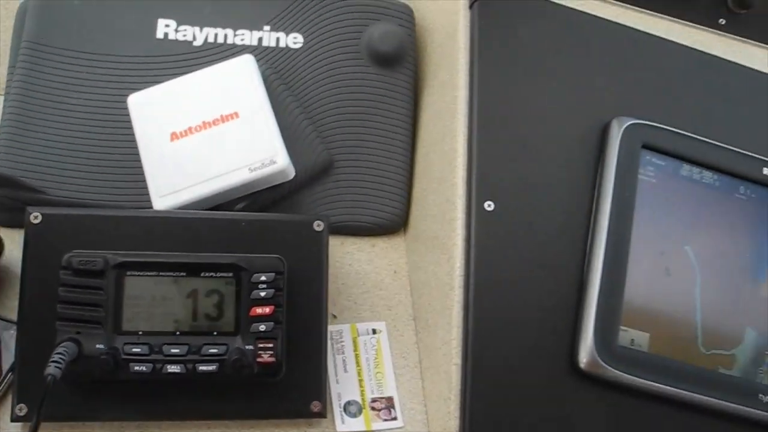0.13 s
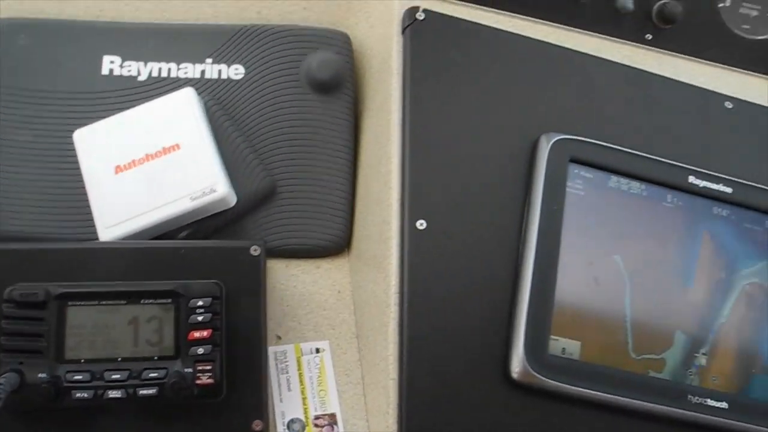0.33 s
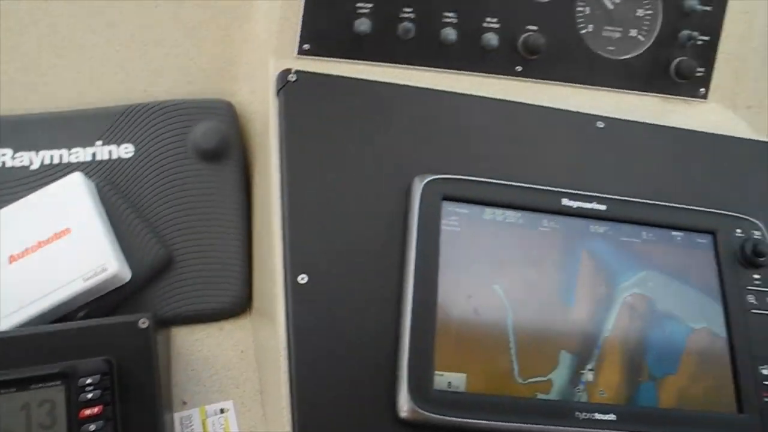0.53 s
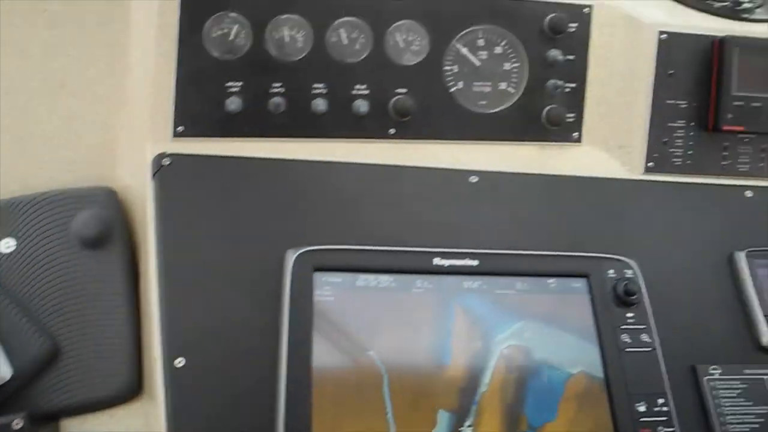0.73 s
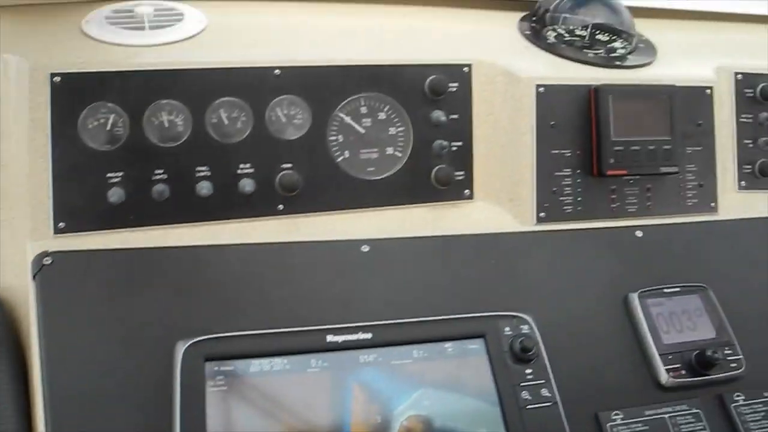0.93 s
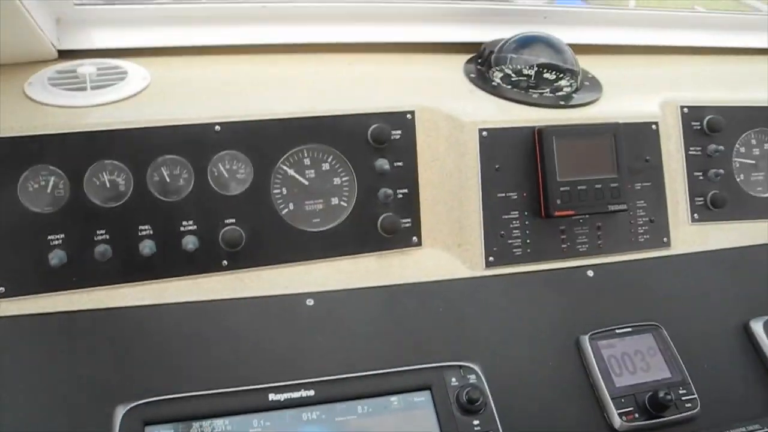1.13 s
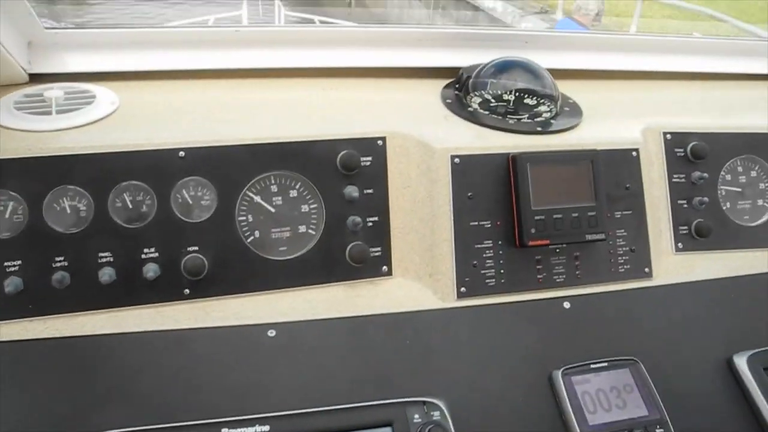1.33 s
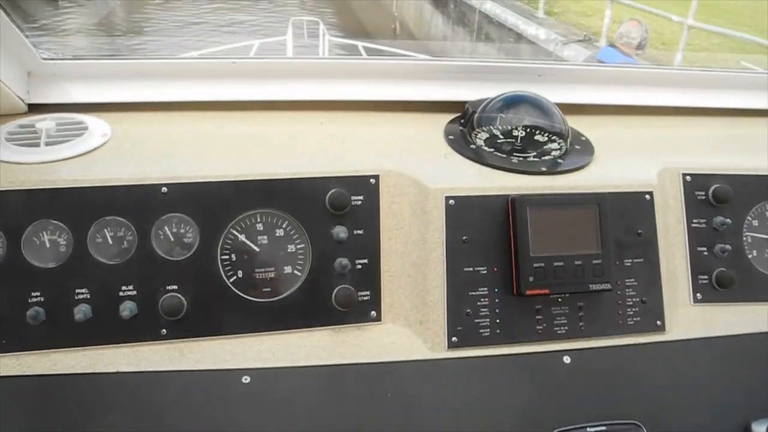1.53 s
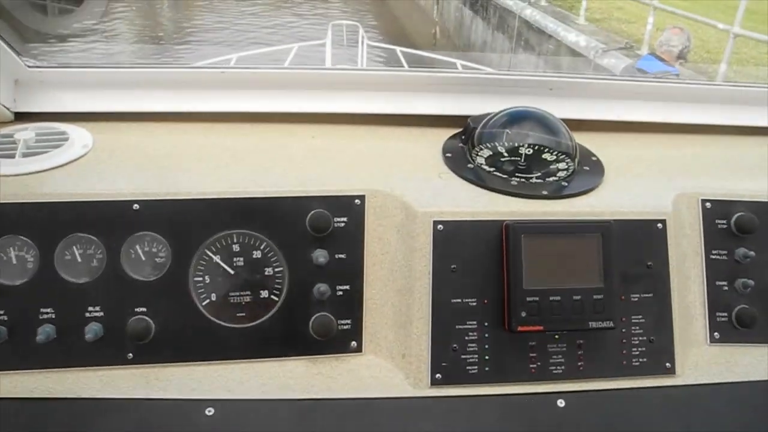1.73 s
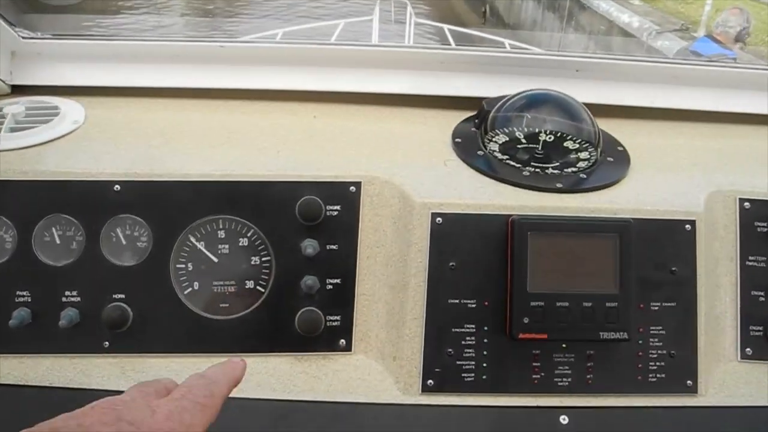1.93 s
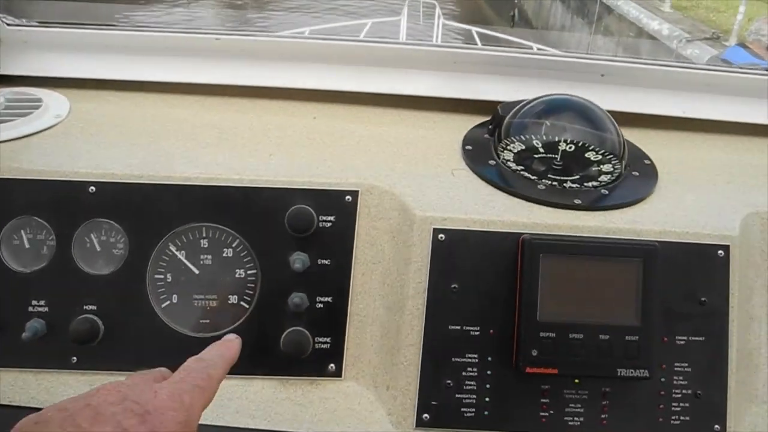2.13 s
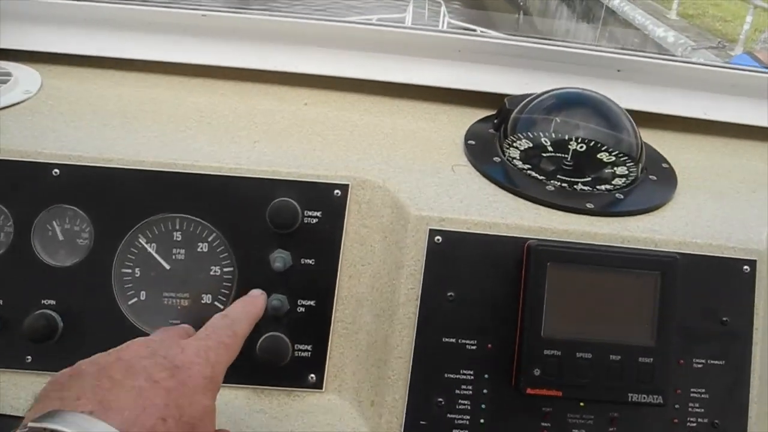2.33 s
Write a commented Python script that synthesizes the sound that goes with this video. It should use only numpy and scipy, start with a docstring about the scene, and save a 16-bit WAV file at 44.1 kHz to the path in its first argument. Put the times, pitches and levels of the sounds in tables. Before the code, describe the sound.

Low, throbbing diesel idle heard inside a small boat cabin. A loud, close knock comes almost at once, bounces quickly and briefly ducks the engines, which swell back and run steadily with a soft whine.

```python
"""Moored boat with idling diesels

Two diesel engines idle below the helm: firing tones, valve ticks, buzzing panels, pulsed hull noise and a whine.
A hard knock close by sets modes ringing; it bounces, and a loose part rattles to rest in a small cabin.
A limiter ducks everything at the loud blows and slowly lets the engines back.
A hand or sleeve brushes softly now and then, as short swells of grainy noise."""
import sys
import numpy as np
from scipy import signal
from scipy.io import wavfile
from scipy.ndimage import uniform_filter1d, minimum_filter1d

SR = 44100
rng = np.random.default_rng(int(sys.argv[2]) if len(sys.argv) > 2 else 0)


def log_audio(samples):
    """Write samples as a 16-bit WAV file to the path given in sys.argv[1]."""
    # one column per channel
    frames = np.atleast_2d(samples).T
    # limit to full scale, then quantise
    limited = np.clip(frames, -1, 1)
    pcm = np.round(limited * 32767).astype(np.int16)
    wavfile.write(sys.argv[1], SR, pcm)


N = 104605
T = np.arange(N) / SR  # time in s

FIRING_HZ, SECOND_FIRING_HZ, FIRST_FIRING_S = 25.05, 29.05, 0.0168
CYLINDERS = 4  # firings in one engine cycle
PULSE_DEPTH = 0.11  # modulation of noise by the firings, in log amplitude


def from_db(db):
    """Level to amplitude: 20 dB is a factor of ten."""
    return 10 ** (np.asarray(db) / 20)


def rms_one(x):
    """Normalization to unit mean power."""
    return x / np.sqrt(np.mean(x ** 2) + 1e-20)


def at_hz(points, hz):
    """Linear interpolation of a table on a logarithmic frequency axis."""
    table = np.array(points)
    return np.interp(np.log(hz), np.log(table[:, 0]), table[:, 1])


def pan(db):
    """Interchannel level difference, positive to the left: two gains with a mean of one."""
    gains = from_db([[db / 2], [-db / 2]])
    return gains / gains.mean()


def filtered(x, hz, kind, order=2):
    """Butterworth filtering: a maximally flat passband."""
    sections = signal.butter(order, np.clip(hz, 10, 0.47 * SR), kind, fs=SR, output="sos")
    return signal.sosfilt(sections, x + 1e-18)


def drift(rate):
    """Random fluctuation of unit spread: noise smoothed by a double pole at the given rate in Hz."""
    step = 40  # samples between computed points
    r = np.exp(-2 * step * np.pi * rate / SR)
    noise = rng.standard_normal(N // step + 2002)
    slow = signal.lfilter([1], [1, -2 * r, r * r], noise)[2000:]  # the start-up is dropped
    return np.interp(np.arange(N) / step, np.arange(len(slow)), rms_one(slow))


def ring(clicks, modes):
    """Modal synthesis: each impulse excites exponentially decaying cosines."""
    out = 0
    for hz, db, t60 in modes:
        r = np.exp(-np.log(1000) / (t60 * SR))
        w = 2 * np.pi * hz / SR
        resonator = [1, -r * np.cos(w)], [1, -2 * r * np.cos(w), r * r]
        out = out + from_db(db) * signal.lfilter(*resonator, clicks + 1e-18)
    return out


def burst(s, decay_s):
    """Impulsive noise: a sudden stereo onset with exponential decay."""
    envelope = (T >= s) * np.exp(-np.minimum(np.abs(T - s) / decay_s, 50))
    return envelope * rng.standard_normal((2, N))


def tone(hz, db):
    """Quasi-periodic tone: a sinusoid with slow random level and phase modulation."""
    turn = 2 * np.pi * (hz * T + rng.random()) + 0.18 * drift(1.0)  # phase waver in rad
    level_db = db + 1.2 * drift(1.6)
    return np.sqrt(2) * from_db(level_db) * np.cos(turn)


# Tones of the nearer engine: firing_multiple, level_db, left_right_db
NEAR_ORDERS = [(2, -31, -38), (4.18, -39, -15), (4.745, -28.5, -3), (5, -35, -2), (7, -48, 6),
               (8.05, -41, -15), (9, -40.5, -7.5), (9.5, -38, -1), (11.8, -44, -11), (15, -42, -14),
               (16.6, -44.5, -10)]
# Tones of the second engine: firing_multiple, level_db, left_right_db
SECOND_ORDERS = [(2, -37.5, -14), (3, -38, 2), (3.75, -48, -3)]
THROB_DB, THROB_PAN_DB, THROB_LEAD_S = -19.5, -9, 0.0074  # the throb reaches the left side first


def engine_tones():
    """Engine orders: tones at multiples of the firing rate, above a throb at the nearer engine's rate."""
    lead_s = np.array([[THROB_LEAD_S], [0]])
    turn = 2 * np.pi * FIRING_HZ * (T - FIRST_FIRING_S + lead_s)
    out = np.sqrt(2) * from_db(THROB_DB) * pan(THROB_PAN_DB) * np.cos(turn)
    for firing_hz, orders in ((FIRING_HZ, NEAR_ORDERS), (SECOND_FIRING_HZ, SECOND_ORDERS)):
        for multiple, db, pan_db in orders:
            out = out + pan(pan_db) * tone(multiple * firing_hz, db)
    return out


REPEAT_SHARE = 0.18  # share of the noise power that repeats with every engine cycle


def engine_noise():
    """Cyclostationary noise: part of it recurs with each cycle of the nearer engine."""
    cycle = rng.standard_normal((2, 2, int(SR * CYLINDERS / FIRING_HZ)))
    repeating = cycle[..., np.arange(N) % cycle.shape[-1]]
    fresh = rng.standard_normal((2, 2, N))
    share = np.clip(REPEAT_SHARE, 0, 1)
    return np.sqrt(share) * repeating + np.sqrt(1 - share) * fresh


# Spectrum of hull and engine-room noise, before normalization: frequency_hz, density_db (dB per Hz)
DRONE = [(35, -9.5), (55, -3.5), (85, 0.5), (120, -4.5), (170, -2), (240, -6), (310, -8), (400, -10),
         (500, -16.5), (660, -16), (800, -21.5), (1000, -21.5), (1400, -27), (1800, -29.5), (2700, -32.5),
         (4000, -42), (6000, -48), (9000, -50), (15500, -50)]
# Correlation of the two channels: frequency_hz, likeness (-1 to 1)
LIKENESS = [(50, 0.98), (200, 0.85), (400, 0.97), (750, 0.49), (1400, 0.15), (2800, -0.3), (5500, 0.063),
            (12000, -0.01)]
# Stereo balance, shared with the panels and the whine: frequency_hz, left_right_db
BALANCE_DB = [(60, -13.5), (150, -4), (380, -2.5), (950, -4.5), (2380, -2.1), (5980, -1), (15000, -3.5)]
DRONE_DB, PATCHY_DB, CLATTER_DEPTH = -24, 1.51, 0.026


def drone():
    """Amplitude-modulated band noise: third-octave bands of hull noise swell with both engines' firings."""
    edges = 32 * 2 ** (np.arange(28) / 3)
    firings = 0
    for firing_hz in (FIRING_HZ, SECOND_FIRING_HZ):
        for k in range(1, 4):
            firings = firings + np.cos(2 * np.pi * k * firing_hz * (T - FIRST_FIRING_S)) / k
    white, out = engine_noise(), 0
    for k, (low, high) in enumerate(zip(edges, edges[1:])):
        hz = np.sqrt(low * high)
        depth = at_hz([(400, PULSE_DEPTH), (1500, CLATTER_DEPTH)], hz)
        pulsed = white[k % 2] * np.exp(0.5 * depth * firings)  # neighbouring bands use separate noise
        mid, side = filtered(pulsed, [low, high], "band")
        alike = np.clip(at_hz(LIKENESS, hz), -1, 1)
        stereo = np.sqrt(1 + alike) * mid + np.sqrt(1 - alike) * side * [[1], [-1]]
        gain = from_db(at_hz(DRONE, hz) + PATCHY_DB * drift(12)) * pan(at_hz(BALANCE_DB, hz))
        out = out + gain * stereo
    return from_db(DRONE_DB) * rms_one(out)


CLATTER_DB, CLATTER_HZ, CLATTER_S, CLATTER_SPREAD_DB = -56.5, (1870, 3600), 0.0024, 8.5


def clatter():
    """Repeated impact noise: the valve gear of both engines ticks at each firing, with random strength."""
    clicks = np.zeros(N)
    for firing_hz in (FIRING_HZ, SECOND_FIRING_HZ):
        at = (np.arange(FIRST_FIRING_S, T[-1], 1 / firing_hz) * SR).astype(int)
        clicks[at] += from_db(CLATTER_SPREAD_DB * np.clip(rng.standard_normal(len(at)), -2, 2))
    envelope = signal.lfilter([1], [1, -np.exp(-1 / (CLATTER_S * SR))], clicks + 1e-18)
    ticks = filtered(envelope * rng.standard_normal((2, N)), CLATTER_HZ, "band")
    return from_db(CLATTER_DB) * rms_one(ticks)


# Panels that buzz with the engines: center_hz, width_hz, level_db
PANELS = [(402.4, 74, -41.5), (841, 56, -48.5), (1711, 35, -59.5), (2550, 420, -57)]


def panels():
    """Forced resonance: narrow bands of noise, driven a little harder at each firing of the nearer engine."""
    out = 0
    shake = np.exp(PULSE_DEPTH * np.cos(2 * np.pi * FIRING_HZ * (T - FIRST_FIRING_S)))
    for hz, width_hz, db in PANELS:
        drive = shake * (rng.standard_normal(N) + 0.19 * rng.standard_normal((2, N)))
        buzz = rms_one(filtered(drive, [hz - width_hz / 2, hz + width_hz / 2], "band"))
        out = out + from_db(db) * pan(at_hz(BALANCE_DB, hz)) * buzz
    return out


# Tones of a gear or pump at their loudest: pitch_multiple, level_db
WHINE = [(1, -43.5), (2.155, -57.5)]
WHINE_HZ, WHINE_SWELL_S, WHINE_SWELL_WIDTH_S, WHINE_SWELL_DB = 794.5, 1.45, 0.63, 19.5


def whine():
    """Tonal machine noise: a fundamental and an overtone under a bell-shaped swell in decibels."""
    swell = np.exp(-0.5 * ((T - WHINE_SWELL_S) / WHINE_SWELL_WIDTH_S) ** 2)
    swell_db = WHINE_SWELL_DB * (swell - 1)
    tones = sum(tone(multiple * WHINE_HZ, db + swell_db) for multiple, db in WHINE)
    return pan(at_hz(BALANCE_DB, WHINE_HZ)) * tones


# Nominal modes of the struck thing: pitch_hz, level_db, t60_s
BODY = [(165, -22, 0.091), (236, -23, 0.045), (312.4, -15, 0.11), (379, -18, 0.1), (545, -13, 0.045),
        (704, -12, 0.057), (760, -21, 0.022), (953, -26, 0.037), (988, -26, 0.071), (1230, -17, 0.039),
        (1315, -16, 0.057), (1584, -16, 0.03), (2000, -27, 0.049), (2380, -37.5, 0.036), (2724, -21, 0.024),
        (3194, -18, 0.016)]
CONTACT_S = 0.00073


def strike(clicks, bright_hz):
    """Impact excitation: a half-sine push plus modal ringing, low-passed as by a soft contact."""
    push = np.sin(np.pi * np.minimum(T[:SR // 100] / CONTACT_S, 1))
    modes = []
    # each blow stirs the modes differently
    for (hz, db, t60), (shift, lift_db) in zip(BODY, rng.standard_normal((len(BODY), 2))):
        modes.append((hz * (1 + 0.015 * shift), db + lift_db, t60))
    pushed = filtered(signal.fftconvolve(clicks, push)[:N], 145, "high", order=1)
    return filtered(pushed + ring(clicks, modes), bright_hz, "low")


# The knock and its bounces:
# start_s, strength_db, contact_cutoff_hz, crack_db, jingle_db, loose_part_kick_db
KNOCKS = [(0.094, 8.5, 2690, -2.5, -21, -1), (0.1672, 1, 3500, -5, -13, -12),
          (0.2103, 1.5, 1230, -25, -35, -5), (0.2428, -3, 1110, -38, -32, -1.5),
          (0.2646, -7, 900, -38, -30, -5), (0.2811, -19, 1000, -34, -36, -0.5),
          (0.2912, -10.5, 2720, -28, -29, -5), (.321, -8, 855, -40, -34, 0)]
THUD_DB, THUD_S, THUD_HZ = -0.5, 0.0053, (178, 1730)  # the body's many short modes
BOOM_DB, BOOM_S, BOOM_HZ = -8.5, 0.051, (168, 720)  # rough rumble of the panel under each blow
CRACK_S, CRACK_HZ = 0.0029, 3500
JINGLE_S, JINGLE_HZ = 0.05, (3500, 4800)
KNOCK_PAN_DB = -1


def knocks():
    """Successive impacts: a hard knock and its bounces, each a strike with decaying noise bursts."""
    out, cracks, jingles = 0, 0, 0
    for s, db, bright_hz, crack_db, jingle_db, _ in KNOCKS:
        thud_noise = from_db(db + THUD_DB) * burst(s + 0.0033, THUD_S)  # 3.3 ms after contact
        thud = filtered(thud_noise, THUD_HZ, "band", order=1)
        click = from_db(db) * (np.arange(N) == int(s * SR))
        out = out + strike(click, bright_hz) + filtered(thud, bright_hz, "low")
        out = out + filtered(from_db(db + BOOM_DB) * burst(s, BOOM_S), BOOM_HZ, "band")
        cracks = cracks + from_db(crack_db) * burst(s, CRACK_S)
        jingles = jingles + from_db(jingle_db) * burst(s, JINGLE_S)
    return out + filtered(cracks, CRACK_HZ, "low", order=1) + filtered(jingles, JINGLE_HZ, "band")


# Reflections from near panels: delay_s, level_db
ECHOES = [(.004, -1), (.0074, -4.5)]
ECHO_CUT_HZ = 1080
CABIN_DB, CABIN_T60_S, CABIN_CUT_HZ = -11.5, 0.29, 1560


def cabin(x):
    """Room response: dull early reflections, then convolution with exponentially decaying diffuse noise."""
    dull = filtered(x, ECHO_CUT_HZ, "low", order=1)
    early = 0
    for s, db in ECHOES:
        early = early + from_db(db) * np.pad(dull, ((0, 0), (int(s * SR), 0)))[:, :N]
    t = T[:SR // 2]
    envelope = np.exp(-np.log(1000) * t / CABIN_T60_S) * (1 - np.exp(-t / 0.00088))
    tail = filtered(rng.standard_normal((2, len(t))), CABIN_CUT_HZ, "low") * envelope
    tail = tail + 0.5 * tail[::-1]  # partly shared by the two sides
    tail = tail / np.sqrt(np.sum(tail ** 2) / 2)
    return x + early + from_db(CABIN_DB) * signal.fftconvolve(x, tail, axes=1)[:, :N]


# Soft brushes of a hand or sleeve: center_s, spread_s, level_db, center_hz
BRUSHES = [(0.19, 0.06, -41, 7500), (0.342, 0.024, -45, 8290), (0.48, 0.021, -49, 3500),
           (0.634, 0.022, -48, 7550), (0.728, 0.041, -50.5, 5440), (.81, 0.017, -45.5, 10800),
           (0.898, 0.017, -49.5, 7850), (1.23, 0.011, -45.5, 13500), (1.296, 0.013, -49, 3600),
           (1.606, 0.035, -55, 5460), (1.784, 0.011, -49, 4700), (2.045, 0.033, -49.5, 4170)]


def brushes():
    """Friction noise: band-passed hiss with a random grain, under bell-shaped envelopes."""
    out, grain = 0, from_db(3.1 * drift(150))
    for s, spread_s, db, hz in BRUSHES:
        band = [hz / np.sqrt(2), hz * np.sqrt(2)]  # one octave
        hiss = rms_one(filtered(grain * rng.standard_normal((2, N)), band, "band", order=1))
        out = out + from_db(db) * np.exp(-0.5 * ((T - s) / spread_s) ** 2) * hiss
    return pan(db=-2.5) * out


# Modes of the loose part: pitch_hz, level_db, t60_s
LOOSE_PART = [(560, -23, 0.018), (715, -22.5, 0.028), (740, -24, .04), (900, -34, .018), (1350, -28, 0.025),
              (1620, -36, 0.023), (2240, -23, 0.02), (2620, -24.5, 0.022)]
RATTLE_START_S, RATTLE_FADE_S, RATTLE_END_S = 0.225, 0.08, 0.36
RATTLE_PER_S, RATTLE_DB, RATTLE_CUT_HZ = 600, -23, 2570  # rate and level before the fade


def rattle():
    """Random impacts: blows kick a loose part, whose chatter grows sparser and weaker until it rests."""
    left = np.clip((RATTLE_END_S - T) / RATTLE_FADE_S, 0, 1) * (T > RATTLE_START_S)
    contacts = rng.random(N) < RATTLE_PER_S * np.sqrt(left) / SR
    touches = contacts * rng.standard_normal(N) * from_db(RATTLE_DB) * np.sqrt(left)
    for s, *_, kick_db in KNOCKS:
        touches[int(s * SR)] += from_db(kick_db)
    return filtered(ring(touches, LOOSE_PART), RATTLE_CUT_HZ, "low", order=3)


def scene():
    """Superposition: engines below, with small sounds at the helm."""
    engines = engine_tones() + whine() + drone() + clatter() + panels()
    impacts = pan(KNOCK_PAN_DB) * cabin(knocks() + rattle())
    return engines + impacts + brushes()


def record(dry):
    """Peak limiting: gain drops at once and recovers slowly; an elliptic low-pass then cuts the top."""
    ceiling_db, release_db_per_s, cutoff_hz = -1, 19, 15900
    peak_db = 20 * np.log10(np.abs(dry).max(axis=0) + 1e-9)
    over = np.maximum(peak_db - ceiling_db, 0)
    # hold the largest overshoot, falling at the release rate
    duck = np.maximum.accumulate(over + release_db_per_s * T) - release_db_per_s * T
    gain_db = uniform_filter1d(minimum_filter1d(-duck, size=21), size=21)
    low_pass = signal.ellip(10, 0.1, 80, cutoff_hz, fs=SR, output="sos")
    return signal.sosfilt(low_pass, dry * from_db(gain_db))


dry = scene()
out = record(dry)
log_audio(out)
```